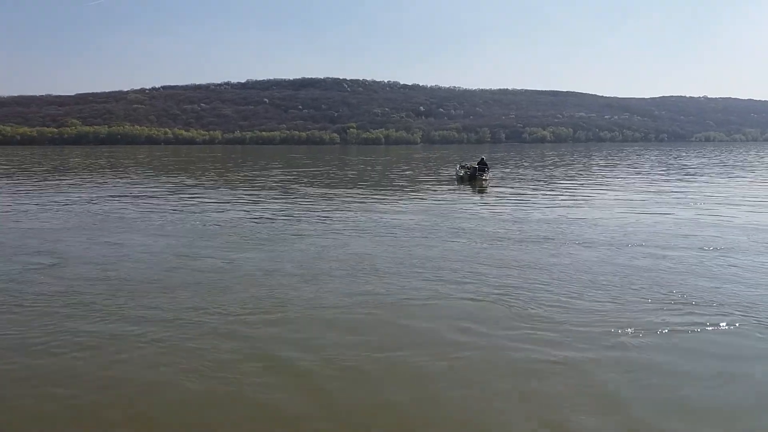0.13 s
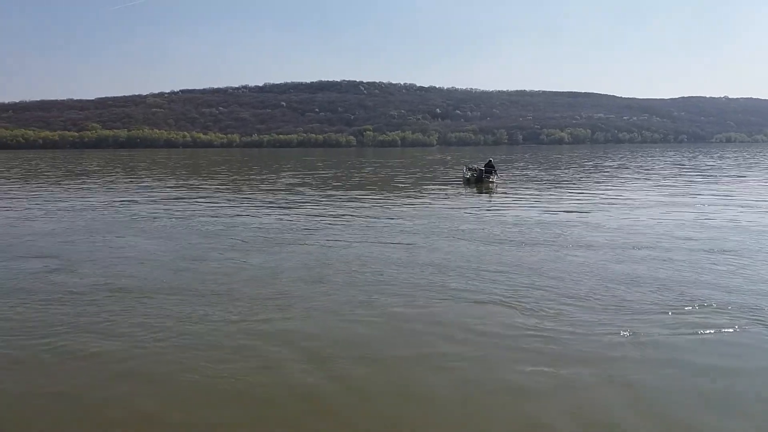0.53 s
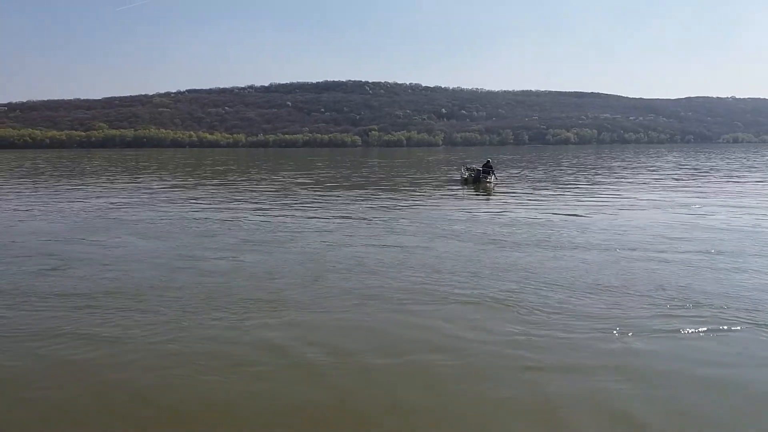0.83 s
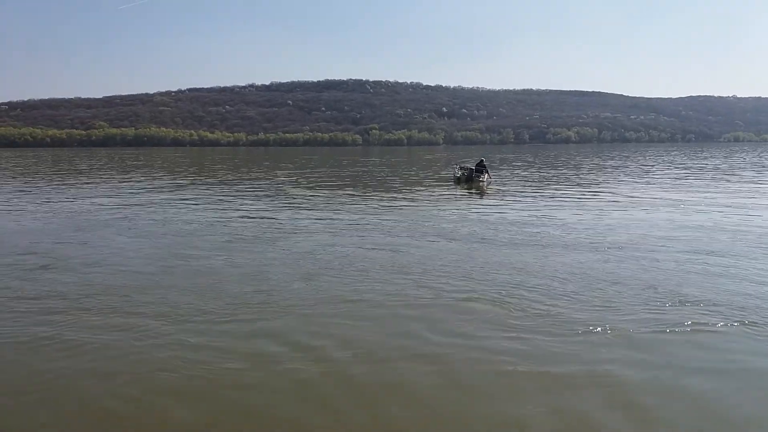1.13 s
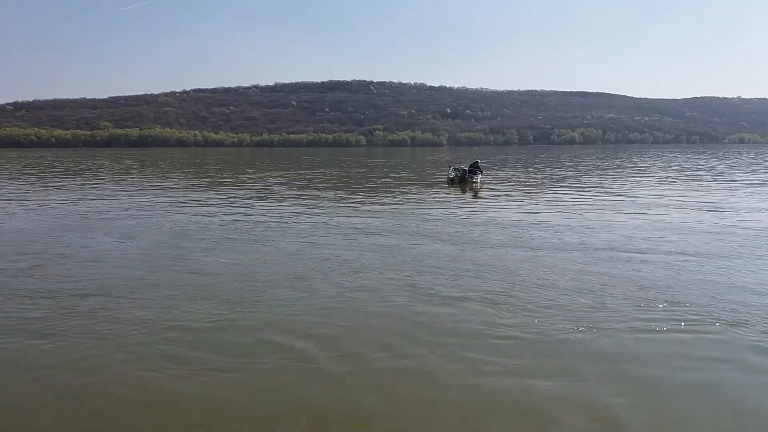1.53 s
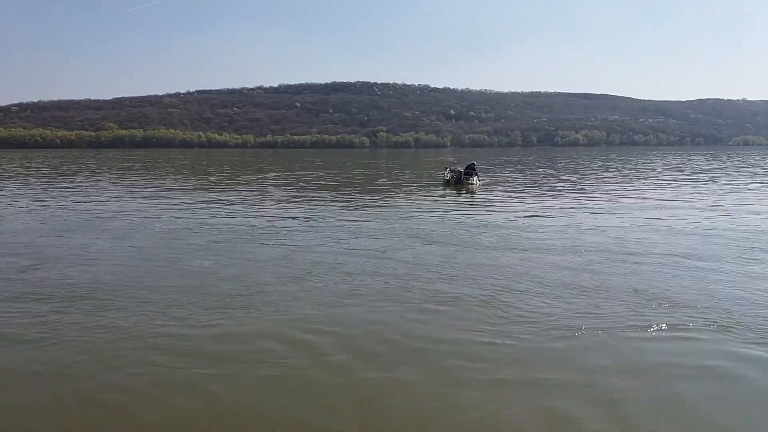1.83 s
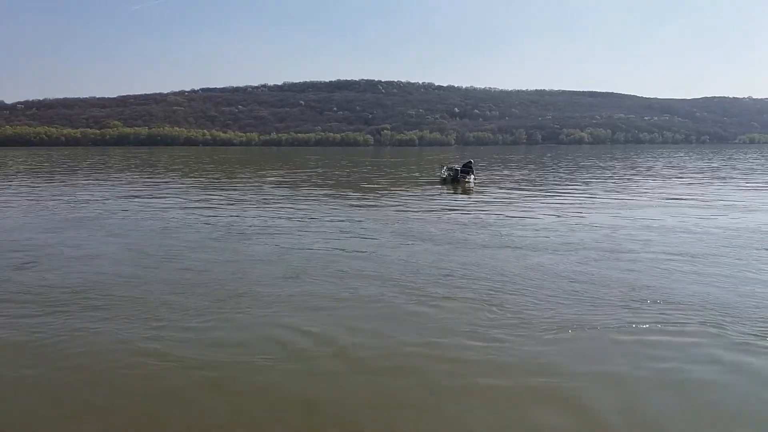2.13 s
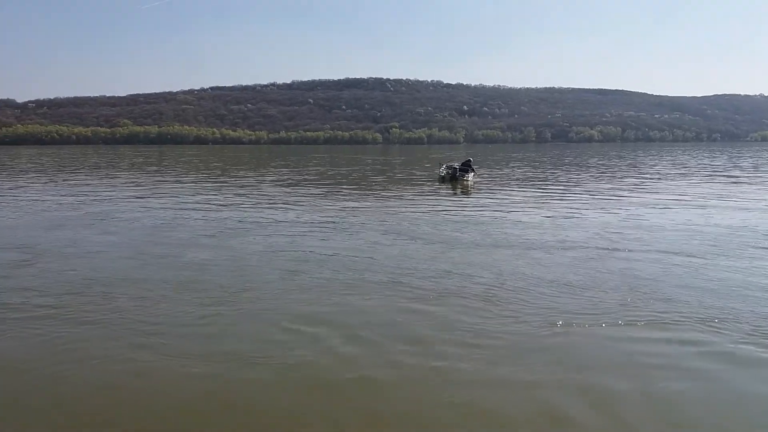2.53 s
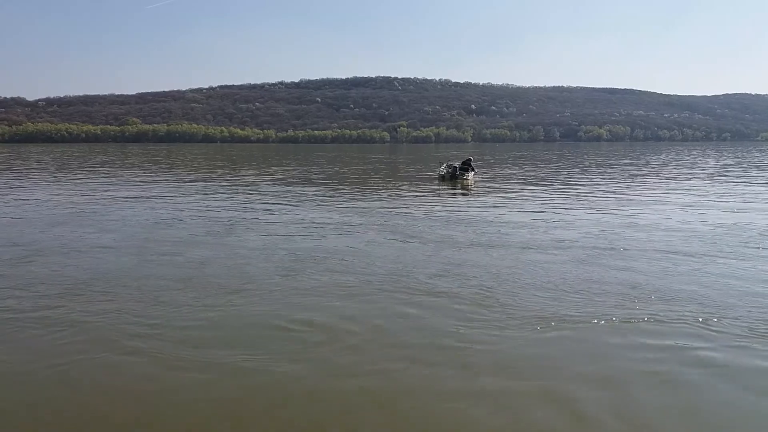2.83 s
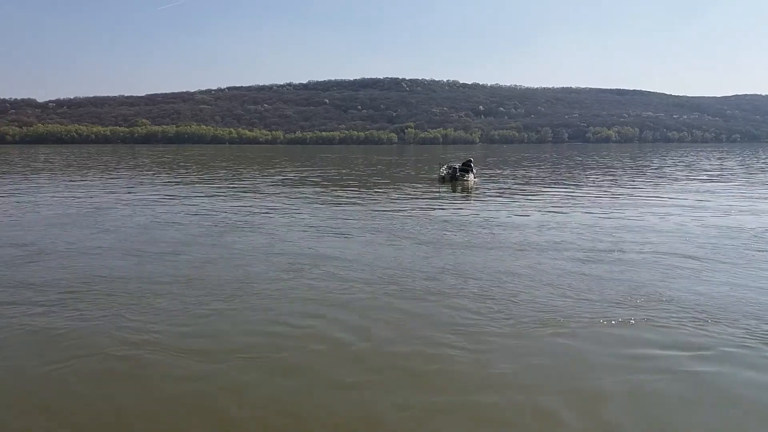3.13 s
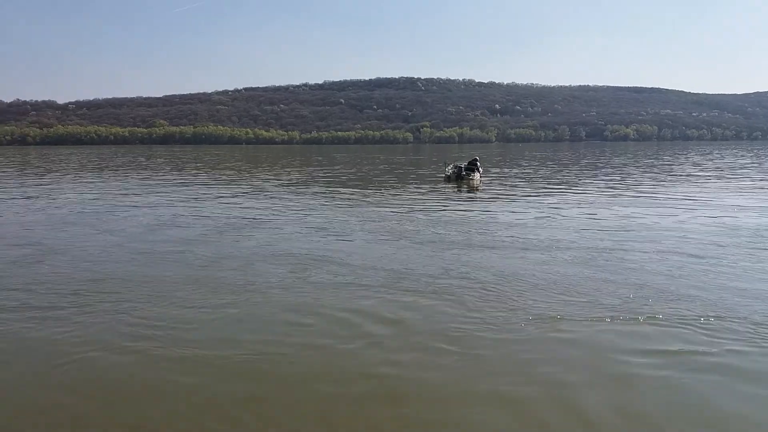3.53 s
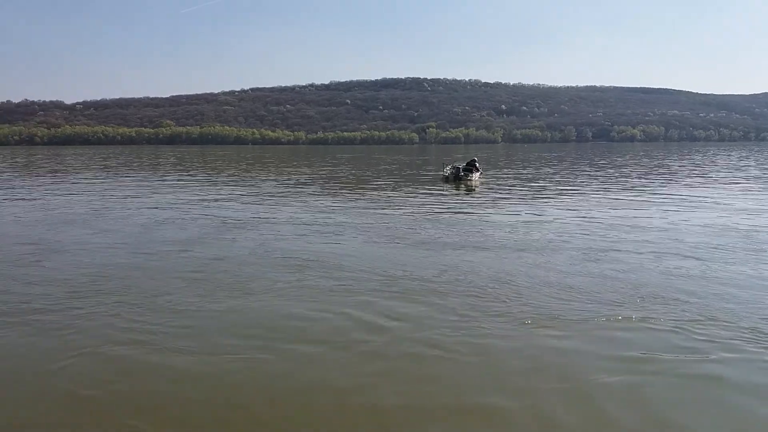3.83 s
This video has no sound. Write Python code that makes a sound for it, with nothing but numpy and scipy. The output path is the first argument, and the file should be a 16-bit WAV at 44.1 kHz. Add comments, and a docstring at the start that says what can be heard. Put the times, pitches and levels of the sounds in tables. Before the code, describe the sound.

Two stones plop into a calm river, over faint lapping and a distant finch.

```python
"""First you hear faint buzzes over a soft hiss, water dripping at a river's edge, and a finch in the trees.
Then come the loudest sounds: two stones plop into the wide, calm river. Each slaps the surface, opens a
hollow and leaves big bubbles that ring upward in pitch, and the bank sends back a low echo.
The ripples lap with small ringing bubbles, and the finch's song is one falling phrase of sliding notes.
The buzzes are the quick steps of a small motor close to the microphone, probably moving a lens."""
import sys
import numpy as np
from scipy import signal
from scipy.fft import rfft, irfft, next_fast_len
from scipy.io import wavfile
from scipy.ndimage import map_coordinates

SR = 44100
rng = np.random.default_rng(int(sys.argv[2]) if len(sys.argv) > 2 else 0)


def master_out(mix):
    """Clip the mix to full scale and print it as 16-bit PCM to the path in sys.argv[1]."""
    frames = np.transpose(np.atleast_2d(mix))
    ceiling = np.clip(frames, -1, 1)
    pcm = np.round(ceiling * 32767).astype(np.int16)
    wavfile.write(sys.argv[1], SR, pcm)


N = 176400  # 4 seconds


# stones hitting the water: t/s, slap level/dB, slap f/Hz, push level/dB, spray level/dB, far echo/dB
STONES = [(1.931, -44, 1160, -32, -48.5, -14.5), (3.108, -45.5, 800, -34.5, -47.5, -19.5)]
# big bubbles of trapped air: t/s, level/dB, starting f/Hz, pitch rise/(Hz/s), swell/s, fade/s
BIG_BUBBLES = [(1.9448, -22.5, 245.4, 5040, 0.0055, 0.019), (1.9559, -26.5, 350, 4300, 0.0045, 0.044),
               (3.1196, -19, 180.5, 9640, 0.0021, 0.059), (3.1206, -31, 836, 1600, 0.0011, .05),
               (3.1392, -29, 321, 7400, 0.0023, 0.045)]
# tone of the spray: f/Hz, level/dB
SPRAY_TONE = [(150, -5), (600, -6), (900, -1), (1300, -2.5), (2100, -2), (3200, -20), (5000, -19.5),
              (7000, -35.5), (9000, -28.5), (15000, -46)]

def plops(slap_s=0.0079, push_s=0.026, push_hz=129, spray_fade_s=0.16):
    """Each stone slaps the water, pushes open a hollow, throws up spray and traps air that rings."""
    out, t = np.zeros(N), clock(0.2)
    for start, slap_db, hz, push_db, spray_db, _ in STONES:
        slap = noise([(hz / 8, -14), (hz / 2, -10), (hz, 0), (2 * hz, -13), (8 * hz, -46)], len(t))
        slap_shape = np.exp(-(2 * t / slap_s - 1) ** 2) * np.minimum(t / 0.0013, 1)
        add(out, start, amp(slap_db) * slap * slap_shape)
        push_t = clock(push_s)
        push = -np.sin(np.pi * push_t / push_s) * np.sin(2 * np.pi * push_hz * push_t)
        add(out, start + 0.0042, amp(push_db) * push)
        spray_shape = amp(-60 * t / spray_fade_s) * np.minimum(t / 0.0012, 1)
        add(out, start + 0.011, amp(spray_db) * noise(SPRAY_TONE, len(t)) * spray_shape)
    for start, db, hz, rise, swell_s, fade_s in BIG_BUBBLES:
        add(out, start, bubble(db, hz, rise, swell_s, fade_s))
    return out


def bubble(db, hz, rise, swell_s, fade_s):
    """A bubble rings, climbing in pitch as it nears the surface and dying away by 60 dB in fade_s."""
    t = clock(0.15)
    swell = np.sin(np.pi / 2 * np.minimum(t / swell_s, 1)) ** 2
    fade = amp(-60 * (t - swell_s) / fade_s)
    return amp(db) * swell * fade * np.sin(2 * np.pi * (hz * t + rise * t * t / 2))


# separate echoes off the near bank: delay t/s, level/dB
BANK_ECHOES = [(.066, -30), (0.096, -18.5), (.108, -19), (.175, -22), (0.246, -26)]
# tone of the near bank's echo: f/Hz, level/dB
NEAR_TONE = [(60, -22), (130, -7.5), (230, -1.5), (330, -1.5), (430, -0.5), (600, -1), (900, -4),
             (2500, 4.5), (8000, -9)]
# tone of the far shore's echo: f/Hz, level/dB
FAR_TONE = [(60, -47), (200, -17.5), (290, -3), (350, 2.5), (410, -3.5), (480, -27), (650, -16), (900, -8),
            (3000, -34)]

def river_echo(sound):
    """The near bank bounces sound back; the far shore adds a long, low echo, weaker for stone two."""
    near = amp(-15.5) * reverb(sound, fade_s=1)
    for delay, db in BANK_ECHOES:
        add(near, delay, amp(db) * sound)
    starts, *_, far_db = np.transpose(STONES)
    far_strength = amp(np.interp(np.arange(N) / SR, starts, far_db))
    far = reverb(sound * far_strength, fade_s=2.45)
    return coloured(near, NEAR_TONE) + coloured(far, FAR_TONE)


# clear drips at the shore: t/s, level/dB, starting f/Hz, fade/s
DRIPS = [(.214, -58.5, 2040, 0.024), (.708, -61, 2170, 0.022), (1.283, -64.5, 2750, 0.037),
         (2.058, -54.5, 2400, 0.016), (2.186, -56, 1620, 0.008), (2.796, -43.5, 2330, 0.017),
         (2.821, -55.5, 2185, 0.015), (2.836, -57.5, 1620, 0.032), (2.919, -57.5, 1500, 0.038),
         (2.962, -54.5, 2600, .025), (3.353, -71, 4930, 0.0043), (3.39, -58, 1840, 0.018),
         (3.549, -65, 4500, 0.0071), (3.63, -57, 2050, 0.022), (3.774, -58, 1650, 0.051),
         (3.922, -60.5, 1840, 0.015), (3.952, -59, 1440, 0.091), (3.961, -58.5, 2100, 0.015)]

def lapping(count=190, rise_per_s=3.8, swell_s=0.0023):
    """Ripples lap: a few clear drips, each a ring in a wet splash, among many faint small bubbles."""
    out, t = np.zeros(N), clock(0.08)
    for start, db, hz, fade_s in DRIPS:
        add(out, start, bubble(db, hz, hz * rise_per_s, swell_s, fade_s))
        splash = noise([(hz / 4, -20), (hz / 2, -6), (hz, 0), (2 * hz, -14), (4 * hz, -34)], len(t))
        add(out, start, amp(db - 12) * splash * amp(-60 * t / fade_s))
    starts = rng.uniform(0, N / SR, count)
    for start, (loudness, pitch) in zip(starts, rng.uniform(-1.01, 1, (count, 2))):
        hz = 1766 * 2 ** (0.736 * pitch)
        add(out, start, bubble(-68 + 4.5 * loudness, hz, hz * rise_per_s, swell_s, fade_s=0.02))
    return out


def gulp(start=0.585):
    """A small wave closes over a hollow at the shore with one low note."""
    out = np.zeros(N)
    add(out, start, bubble(db=-55.5, hz=104.5, rise=0, swell_s=0.015, fade_s=0.2))
    return out


# tiny bubbles popping: t/s, level/dB
POPS = [(2.165, -65.5), (2.339, -64), (2.525, -65), (2.658, -65), (2.88, -66), (3.778, -66)]
# tone of a pop: f/Hz, level/dB
POP_TONE = [(3000, 7), (5000, -1), (6500, -8), (8300, 5), (10000, -9.5), (15000, -8)]

def fizz(count=70, from_s=1.6):
    """Tiny bubbles burst in the stirred water: a few clear pops and many faint ones at random."""
    out, t = np.zeros(N), clock(0.04)
    faint_pops = list(zip(rng.uniform(from_s, N / SR, count), rng.normal(-72.5, 3.5, count)))
    for start, db in POPS + faint_pops:
        add(out, start, amp(db) * noise(POP_TONE, len(t)) * np.exp(-t / 0.0075))
    return out


# the finch's notes: t/s, length/s, relative level/dB, kind of note
SONG = [(0.292, 0.064, -76.5, "whistle"), (0.497, .05, -79, "whistle"), (1.12, 0.072, -82.5, "thin"),
        (1.225, .06, -78, "thin"), (1.328, 0.06, -66.5, "scoop"), (1.457, .076, -65, "scoop"),
        (1.596, 0.087, -65, "scoop"), (1.738, .078, -64, "scoop"), (1.882, 0.09, -62.5, "scoop"),
        (2.025, .078, -62.5, "scoop"), (2.173, .08, -63, "scoop"), (2.273, 0.058, -69, "trill"),
        (2.885, .09, -64, "flourish")]
# the basic tune of each kind of note: f/Hz at evenly spaced moments
NOTE_TUNES = {"whistle": [4150, 4300, 4300, 4190], "thin": [5450, 4800, 5900], "scoop": [4500, 3530, 3310,
              3096, 3640, 4300, 4860], "trill": [3800, 4200, 4400], "fall": [3730, 2966, 2600, 2210, 2100],
              "flourish": [3060, 3580, 3350, 2910, 2450]}
# how raspy each kind of note is: flutter as a share of its pitch
RASP = {"whistle": 0.0089, "thin": 0.0084, "scoop": 0.03, "trill": 0.072, "fall": 0.0804, "flourish": .035}

def finch(fall_count=6, sink_per_s=0.0595):
    """A finch whistles sliding, slightly raspy notes, which the branches and trees scatter and blur."""
    song = np.zeros(N)
    scoops_middle = np.mean([start for start, _, _, kind in SONG if kind == "scoop"])
    falling_run = [(2.302 + k * 0.087, 0.055, -66.5, "fall") for k in range(fall_count)]
    for start, length, db, kind in SONG + falling_run:
        progress = clock(length) / length
        tune = NOTE_TUNES[kind]
        hz = np.interp(progress, np.linspace(0, 1, len(tune)), tune)
        flutter = RASP[kind] * wander(900, len(progress))
        # each "scoop" note is a little lower than the one before
        sink = sink_per_s * (start - scoops_middle) if kind == "scoop" else 0
        whistle = np.sin(2 * np.pi * np.cumsum(hz * (1 + flutter - sink)) / SR)
        add(song, start, amp(db) * np.sqrt(2 * np.sin(np.pi * progress)) * whistle)
    branches = amp(-7) * reverb(song, fade_s=0.082)
    trees = amp(-2.5) * reverb(song, fade_s=1)
    return amp(-1.5) * song + branches + trees


# when each motor buzz starts: t/s
BUZZ_STARTS = [0.02, .183, 0.4182, 0.492, .653, .889, .9632, 1.1246, 1.360, 1.433, 1.594, 1.832, 2.297,
               2.368, 2.535, 2.772, 2.846, 3.007, 3.477, 3.714, 3.790, 3.951]
# strength of each step in a buzz: relative level/dB
STEP_LEVELS = [-1.5, 1, -2, -1.5, -15]
# how the motor's case muffles it: f/Hz, level/dB
CASE_TONE = [(30, -23), (100, -1), (210, 2), (430, -7.5), (650, -11.5), (900, -16), (1500, -46),
             (4000, -62)]

def motor(steps_per_s=216.2):
    """A small motor clicks through a handful of steps, so fast that they buzz through its case."""
    clicks = np.zeros(N)
    for start in BUZZ_STARTS:
        for k, db in enumerate(STEP_LEVELS):
            click = -amp(-18.5 + db + rng.normal(0, 1, 1))
            add(clicks, start + k / steps_per_s, click)
    return coloured(clicks, CASE_TONE)


# tone of the background rumble and hiss: f/Hz, level/dB
AIR_TONE = [(20, -19.5), (32, -16.5), (50, 5), (75, 5.5), (120, -2.5), (180, -3.5), (260, -8), (350, -10),
            (550, -13), (900, -15), (1600, -16), (2700, -18.5), (3600, -23.5), (4700, -25), (5700, -31),
            (8000, -31.5), (11000, -32), (15700, -27.5)]

def air():
    """Quiet open air and microphone hiss, drifting slightly in loudness."""
    return amp(-64 - 0.3 * wander(5.95, N)) * noise(AIR_TONE, N)


def amp(db):
    """Turn decibels into a number to multiply a sound by."""
    return 10 ** (np.asarray(db) / 20)


def clock(seconds):
    """The time of every sample in a sound this long."""
    return np.arange(int(seconds * SR)) / SR


def add(out, start, sound):
    """Mix a sound into out, beginning at start seconds."""
    i = round(start * SR)
    out[i:i + len(sound)] += sound[:max(len(out) - i, 0)]


def coloured(sound, tone):
    """Make a sound's lows and highs louder or softer, following rows of f/Hz, level/dB."""
    size = 2 * next_fast_len(len(sound) // 2 + 8192)
    hz, db = np.transpose(tone)
    gain = amp(np.interp(np.log(np.fft.rfftfreq(size, 1 / SR) + 1), np.log(hz), db))
    # fold the filter forward in time, so it never rings before the sound arrives
    folded = irfft(np.log(gain))
    folded[1:size // 2] *= 2
    folded[size // 2 + 1:] = 0
    return irfft(rfft(sound, size) * np.exp(rfft(folded)))[:len(sound)]


def noise(tone, size):
    """Noise with the given tone and an average power of 1."""
    hiss = coloured(rng.standard_normal(size), tone)
    return hiss / np.sqrt(np.mean(hiss ** 2) + 1e-20)


def reverb(sound, fade_s):
    """Countless tiny echoes blend into a tail that builds up, then dies away."""
    t = clock(1.9)
    tail = rng.standard_normal(len(t)) * amp(-60 * t / fade_s) * (1 - np.exp(-t / 0.0077))
    return signal.fftconvolve(sound, tail / np.linalg.norm(tail))[:N]


def wander(rate, size):
    """A smooth curve through random values, rate of them each second."""
    return map_coordinates(rng.standard_normal(4000), [np.arange(size) * rate / SR])


def scene():
    """Everything reaches one microphone on the shore."""
    stones = plops()
    return (stones + river_echo(stones) + finch() + lapping() + gulp() + fizz() + motor() + air())[None]


def record(dry, low_cut_hz=86, top_hz=15750):
    """The microphone weakens the deep bass and loses the very highest treble."""
    thinned = signal.sosfilt(signal.butter(2, low_cut_hz, "highpass", fs=SR, output="sos"), dry)
    size = next_fast_len(N + 8192)
    below_top = np.fft.rfftfreq(size, 1 / SR) < top_hz
    return irfft(rfft(thinned, size) * below_top, size)[:, :N]


dry = scene()
out = record(dry)
master_out(out)
```